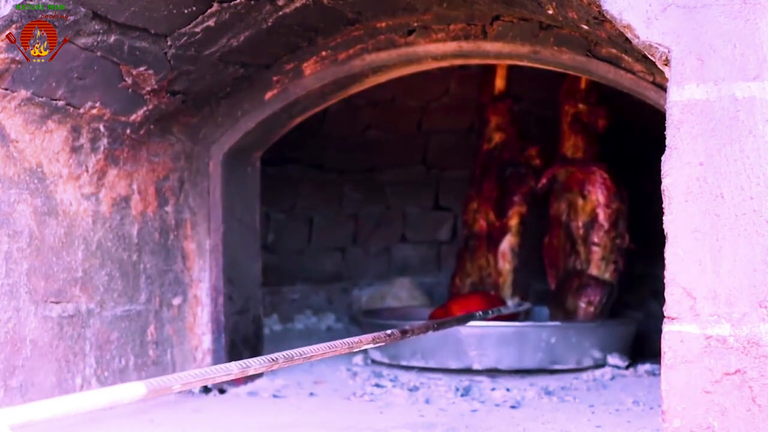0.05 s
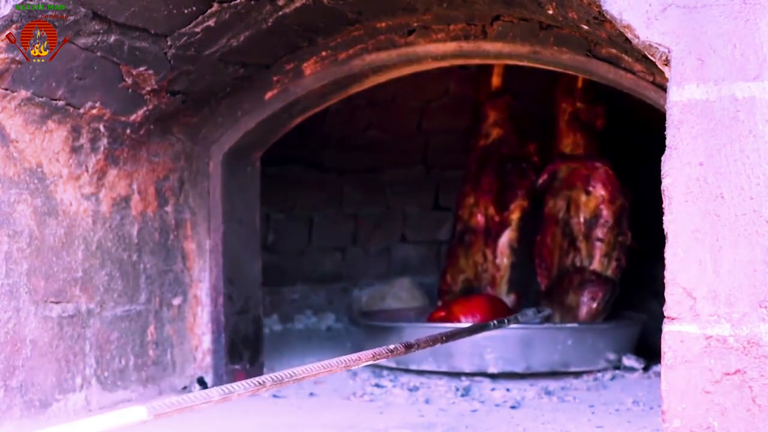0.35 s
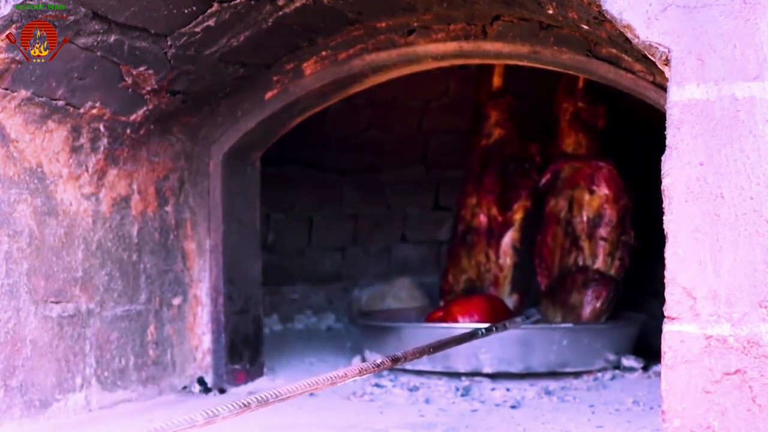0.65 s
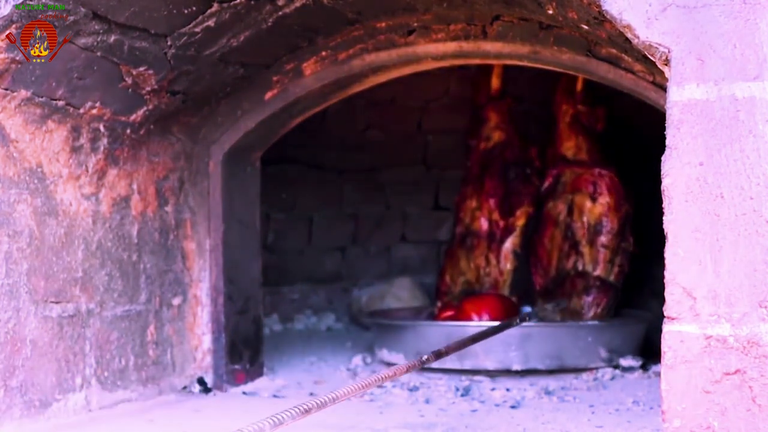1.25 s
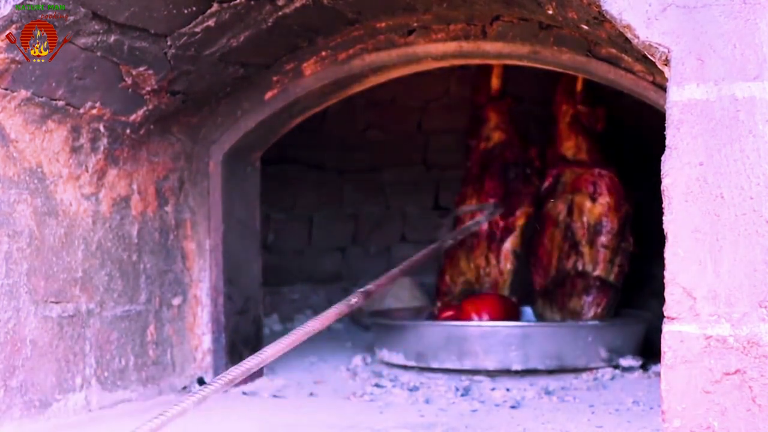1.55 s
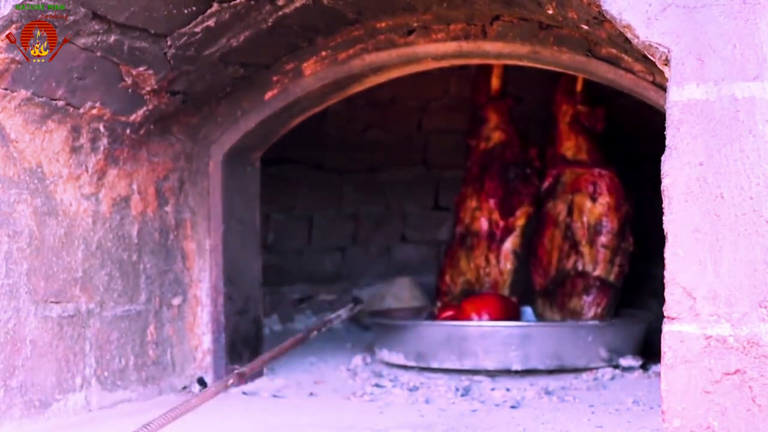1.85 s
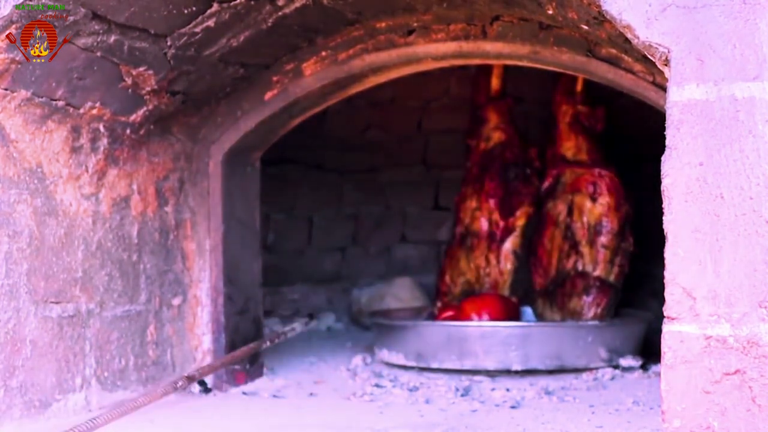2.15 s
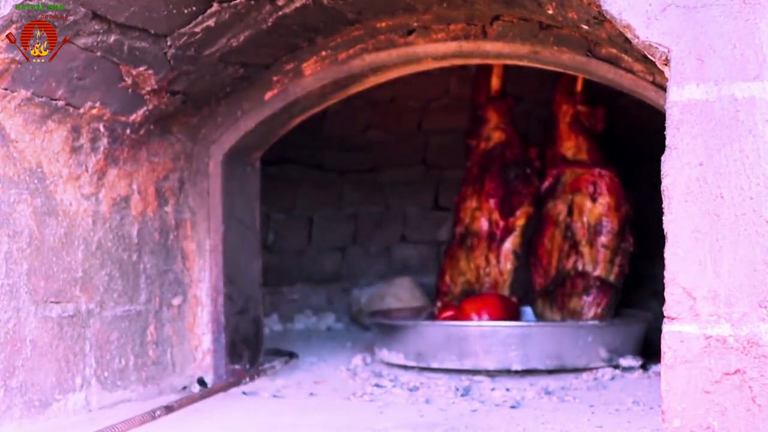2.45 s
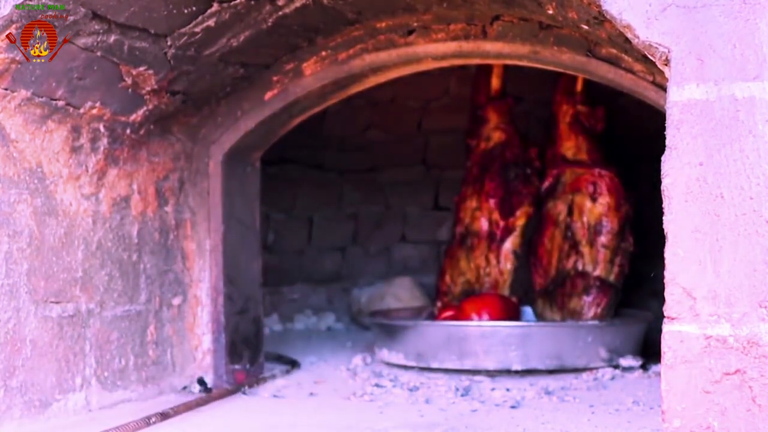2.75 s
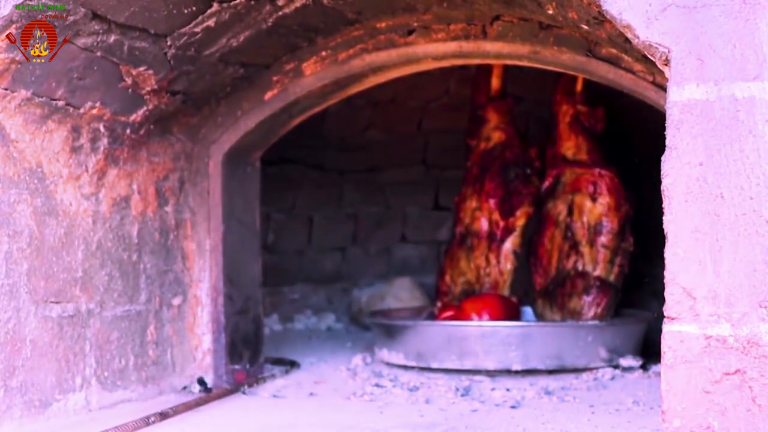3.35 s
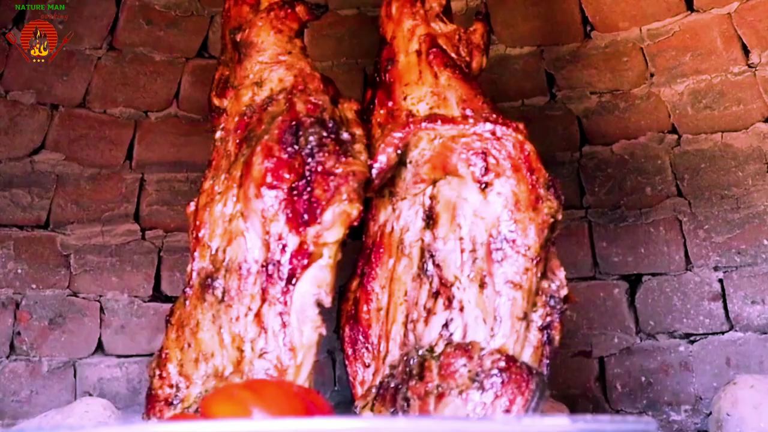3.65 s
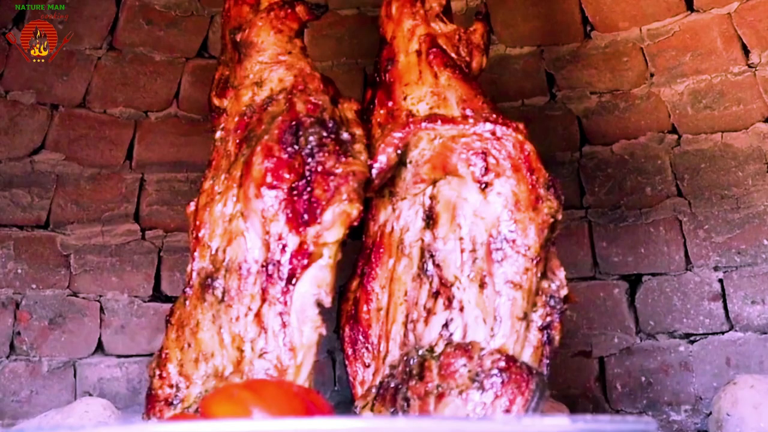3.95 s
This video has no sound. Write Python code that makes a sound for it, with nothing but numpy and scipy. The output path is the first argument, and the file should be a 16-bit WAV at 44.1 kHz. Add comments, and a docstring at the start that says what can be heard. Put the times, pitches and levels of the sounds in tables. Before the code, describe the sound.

Long metal tool scrapes a pan over a gritty oven floor, then knocks down, ringing.

```python
"""A gritty, ringing scrape: a long metal tool pushes a roasting pan over the floor of a brick oven.
Grit slips and cracks under the juddering pan, and the tool catches on it and bumps its rim.
Drawn out, the tool lands on the sill in a few bouncing knocks, head and shaft ringing; faint
clatter follows. Outdoors, wind rumbles on the microphone throughout, and in the second half
one small bird chirps while others twitter far away."""
import sys
import numpy as np
from scipy import signal
from scipy.fft import rfft, irfft, next_fast_len
from scipy.io import wavfile
from scipy.ndimage import map_coordinates

SR = 44100
rng = np.random.default_rng(int(sys.argv[2]) if len(sys.argv) > 2 else 0)


def transcribe(u):
    """Save the signal u as a 16-bit wav file named by the first command-line argument.

    u: samples, shape (n,) or (channels, n), limited to [-1, 1]; the rate is SR.
    q: integer samples, one column per channel.
    """
    v = np.clip(np.atleast_2d(u).T, -1, 1)
    q = np.round(v * 32767).astype(np.int16)
    wavfile.write(sys.argv[1], SR, q)


N = 176400

# faders of the three scrape layers: time_s, grind_db, rasp_db, hiss_db
SCRAPE_FADERS = [(0, -48, -55.5, -90), (.11, -46.5, -47, -63), (.3, -46, -49.5, -59),
                 (.35, -45.5, -48.5, -53.5), (.47, -43.5, -50, -55), (.53, -48, -54, -51.5),
                 (.65, -56.5, -53.5, -48), (.72, -49, -51, -53.5), (.78, -55, -53, -51.5),
                 (.89, -50, -56, -49), (.906, -58, -79, -63), (.93, -53.5, -58, -51.5),
                 (.99, -56.5, -54, -56.5), (1.09, -49, -49.5, -61), (1.165, -48.5, -55, -57.5),
                 (1.24, -59, -56, -58), (1.34, -49, -54.5, -65), (1.41, -65.5, -65.5, -78),
                 (1.48, -60.5, -62, -84), (1.56, -87, -96, -90), (1.9, -81, -73, -78),
                 (2.03, -57.5, -72, -76), (2.15, -79, -80, -72), (2.31, -87, -92, -92),
                 (2.36, -54, -75, -63.5), (2.43, -86, -89, -103)]
# tone of the low grind: freq_hz, gain_db
GRIND_EQ = [(200, -22), (430, -29), (720, -7), (1250, 7.5), (1900, 7.5), (2800, 1.5), (3800, -0.5),
            (7000, -39)]
# tone of the gritty rasp: freq_hz, gain_db
RASP_EQ = [(1200, 7), (2800, 5.5), (4000, 3), (4800, 6.5), (5900, 3.5), (7500, 2.5), (8700, 4), (9700, -16),
           (14000, -112)]
# tone of the fine hiss: freq_hz, gain_db
HISS_EQ = [(5000, 5), (8500, 13.5), (10200, 3), (13500, 7), (15800, -3)]
# resonances of the pan: pitch_hz, width_hz, gain_db
PAN_MODES = [(712, 12, -5.5), (855, 11.6, 0.5), (1160, 55, -9), (1255, 24, -1.5), (1523, 15, -2),
             (1714, 25, -2), (2042, 27, -7), (2300, 82, -11.5), (3050, 120, -16.5), (4640, 120, -16),
             (4960, 94, -15)]
# stereo image of the scrape, nearly mono: freq_hz, correlation
SCRAPE_IMAGE = [(100, .997), (1200, 0.98), (5000, 1), (9000, 1), (14000, 0.86)]

# gusts of wind: time_s, level_db
WIND_FADER = [(0.0, -44.5), (0.23, -46.5), (0.42, -42), (0.59, -46.5), (0.75, -37.5), (1.41, -37.5),
              (1.6, -42), (2.19, -41), (2.25, -45.5), (2.47, -39.5), (2.68, -41), (2.71, -46),
              (3.94, -46.5), (4.0, -40)]
# tone of the wind rumble: freq_hz, gain_db
WIND_EQ = [(12, 7), (28, -2), (55, -2), (90, -5), (150, -13), (280, -23), (600, -45), (2000, -81)]
# stereo image of the wind, nearly mono: freq_hz, correlation
WIND_IMAGE = [(25, .9995), (60, .999), (150, .997), (400, .99)]
# tone of the open air: freq_hz, gain_db
AIR_EQ = [(100, -1), (300, -3.5), (650, 3), (1200, -4.5), (2500, -8.5), (5000, -14), (8000, -19),
          (10500, -12.5), (14000, -18), (15800, -18.5)]
# stereo image of the air, wide above the bass: freq_hz, correlation
AIR_IMAGE = [(100, 1), (600, 0.67), (4000, 0.23), (10000, 0.58)]

# the pan's edge bites: start_s, level_db, length_s, centre_hz
PAN_BITES = [(.14, -51.5, 0.17, 4770), (0.542, -55, 0.1, 6200), (0.551, -48.5, 0.059, 8100),
             (.6, -53, 0.18, 13100)]
# the tool catches on the pan: start_s, level_db, ring_t60_s, centre_hz
PAN_BUMPS = [(0.193, -45, 0.056, 1720), (0.281, -41.5, 0.056, 1180), (0.294, -38, 0.047, 1180),
             (0.393, -38.5, 0.055, 666), (0.413, -47, 0.071, 680), (0.452, -39.5, 0.034, 1260),
             (1.185, -27.5, 0.01, 1243)]
# tone of a bump: multiple_of_centre, gain_db
BUMP_EQ = [(.17, -13), (.5, -25), (1, 12), (1.5, -3), (2.3, -3), (3, -32), (7.5, -38)]
# swells of the sliding pan's rumble: time_s, level_db
SLIDE_FADER = [(.55, -68), (.72, -55.5), (.89, -49), (.99, -66), (1.095, -52.5), (1.17, -62), (1.3, -78)]
# hollow tone of that rumble: freq_hz, gain_db
SLIDE_EQ = [(70, -21), (130, -1.5), (215, 1.5), (300, -10.5), (450, -16.5), (800, -45)]

# tone of metal on brick: freq_hz, gain_db
CLACK_EQ = [(100, -16), (300, -3.5), (600, 6.5), (1400, 2.5), (2500, -1), (4200, -4.5), (8000, -3),
            (9500, -1.5), (15000, -10)]
# light scuffs of the tool: start_s, level_db, cutoff_hz, rise_s
SCUFFS = [(1.295, -44, 9050, .008), (1.327, -36, 4430, 0.015), (1.455, -54, 4000, 0.013),
          (2.951, -36.5, 900, 0.015), (3.893, -45, 1600, 0.0078), (3.901, -39, 1900, 0.0041),
          (3.95, -30.5, 5630, 0.0095), (3.968, -33.5, 4230, 0.0035)]
# the head's rebound clonk, then dull taps: start_s, level_db, pitch_hz
HOLLOW_TAPS = [(2.679, -24.5, 1363), (3.856, -37.5, 660), (3.867, -41, 670), (3.894, -35.5, 546),
               (3.902, -34.5, 625)]

# calls of the nearer bird: start_s, level_db, start_pitch_hz
BIRD_CHIRPS = [(2.577, -47.5, 3550), (2.598, -58, 2960), (2.943, -53, 3500), (2.989, -49, 3300),
               (3.325, -55, 3200), (3.38, -52.5, 3010)]
# swells of the far birds: time_s, level_db
TWITTER_FADER = [(3.17, -80), (3.23, -65), (3.31, -62.5), (3.38, -80), (3.44, -75), (3.485, -57.5),
                 (3.55, -64), (3.62, -60), (3.7, -75), (3.8, -86)]
# tone of the far birds: freq_hz, gain_db
TWITTER_EQ = [(3500, -32), (4800, -14), (5800, -10), (7000, -13), (8500, -35)]

# the tool bounces on the sill: start_s, clack_db, cutoff_hz, head_db, ping_db, shaft_db, shimmer_db
SILL_KNOCKS = [(2.6369, -33, 7400, -26.5, -24.5, -58, -47), (2.6408, -29.5, 7500, -50, -50, -48, -70),
               (2.679, -32, 2000, -32.5, -36.5, -44.5, -79), (2.8505, -40, 3900, -46.5, -40.5, -49.5, -75),
               (2.877, -45, 3980, -56, -48, -67, -75), (2.882, -40, 1430, -53, -60, -65, -80),
               (2.976, -29.5, 1790, -38, -50, -32.5, -64), (2.983, -32.5, 2240, -54, -60, -52, -62),
               (3.0, -38, 1280, -64, -70, -66, -77), (3.0114, -27.5, 2500, -45, -36, -30, -64),
               (3.0185, -32.5, 2490, -50, -55, -42, -52)]
# modes of the tool's head: pitch_hz, level_db, t60_s
HEAD_MODES = [(345, -9, .05), (465, -9, .05), (835, -5, .06), (1048, -6, .068), (1409, -4, .055),
              (1620, -1, .057), (1829, -5, .06), (3084, -8, .05), (3252, -7, .045), (3740, -6, .055),
              (4022, -3, .04), (4207, -2, .05), (4598, -1, .065), (5556, 3, .042), (6880, -9, .06),
              (7510, -10, .05), (8250, -3, .07)]
# the head's single clear ping: pitch_hz, level_db, t60_s
PING_MODE = [(2712, 0, .065)]
# modes of the shaft: pitch_hz, level_db, t60_s
SHAFT_MODES = [(564, -2.5, .085), (646, -2.5, .085), (720, -6, .07), (790, -3, .075), (990, -2, .09),
               (1020, -5, .07), (1101, 0, .08), (1217, -4, .075), (1292, 0, .07), (1320, 0, .08),
               (1455, -2, .08), (1768, -4, .07), (1890, -5, .065), (2056, 0, .07), (2176, 0, .075),
               (2340, 1, .07), (2990, -10, .08)]
# the shaft's high shimmer: pitch_hz, level_db, t60_s
SHIMMER_MODES = [(3338, -3, .12), (3560, -5, .1), (3844, -1, .09), (4215, 0, .16), (4393, -2, .14),
                 (4678, -6, .18), (5222, 2, .12), (5658, -6, .12), (6250, -6, .1), (6700, -8, .09),
                 (7260, -4, .12), (7650, -9, .09)]
# the steel edge meets bare brick: start_s, relative_db
EDGE_HITS = [(2.6374, -8), (2.8484, -43), (2.9755, -31.5)]
# modes of that edge: pitch_hz, level_db, t60_s
EDGE_MODES = [(3570, -2.5, 0.0067), (4400, 4.5, 0.0022), (5200, -17, 0.0018), (7860, -9, 0.0073)]

CRACK_T60_S = 0.0027  # the snap at the front of a bump or clack
TOP_HZ = 15850


def amp(db):
    """Decibels to gain."""
    return 10 ** (np.asarray(db) / 20)


def unit(x):
    """Scale to rms 1."""
    return x / np.sqrt(np.mean(x ** 2) + 1e-20)


def along(points, hz):
    """Read a curve of (freq_hz, value) points on a log frequency axis."""
    freqs, values = np.transpose(points)
    return np.interp(np.log(hz + 1), np.log(freqs + 1), values)


def faders(rows):
    """One value per sample for each column after the time."""
    times, *columns = np.transpose(rows)
    return [np.interp(np.arange(N) / SR, times, column) for column in columns]


def wobble(per_s):
    """A smooth random curve with per_s knots a second."""
    return map_coordinates(rng.standard_normal(4096), [np.arange(N) * per_s / SR], mode="wrap")


def filtered(x, response):
    """Filter x by a function of frequency."""
    n = x.shape[-1]
    size = next_fast_len(n + 8192)
    return irfft(rfft(x, size) * response(np.fft.rfftfreq(size, 1 / SR)), size)[..., :n]


def coloured(x, eq):
    """x through an EQ curve, at rms 1."""
    return unit(filtered(x, lambda hz: amp(along(eq, hz))))


def causal(x, gain, size=2048):
    """Minimum-phase EQ of energy 1: no ringing ahead of the attack."""
    cepstrum = irfft(np.log(np.maximum(gain(np.fft.rfftfreq(size, 1 / SR)), 1e-6)))
    folded = 2 * cepstrum[:size // 2] * np.sign(np.arange(size // 2))
    impulse = irfft(np.exp(rfft(folded, size)))
    return signal.fftconvolve(x, impulse / np.linalg.norm(impulse))[:len(x)]


def patchy(x, depth_db, width_hz, life_s):
    """Shifting resonances: random gain patches over frequency and time, at rms 1."""
    spectra = signal.stft(x, nperseg=1024)[2]
    bins, frames = np.indices(spectra.shape[-2:])
    position = [bins * SR / 1024 / width_hz, frames * 512 / SR / life_s]
    patches = map_coordinates(rng.standard_normal((512, 512)), position, order=1, mode="wrap")
    return unit(signal.istft(spectra * amp(depth_db * unit(patches)), nperseg=1024)[1][..., :N])


def stereo(pair, image):
    """Blend two unrelated signals into left and right with the image's correlation."""
    angle = lambda hz: np.arccos(np.clip(along(image, hz), -1, 1)) / 2
    mid, side = filtered(pair, lambda hz: np.array([np.cos(angle(hz)), np.sin(angle(hz))]))
    return np.array([mid + side, mid - side])


def add(out, start_s, x):
    """Mix x into out at start_s."""
    part = out[max(round(start_s * SR), 0):][:len(x)]
    part += x[:len(part)]


def fade(t60):
    """A decay that loses 60 dB in t60 seconds."""
    return 1000. ** (-np.arange(SR // 3) / SR / t60)


def burst(t60):
    """Noise that dies away."""
    return fade(t60) * rng.standard_normal(SR // 3)


def ring(modes):
    """One blow on a set of modes, each at a random phase and slightly varied level."""
    t = np.arange(SR // 3) / SR
    return sum(amp(db + rng.normal(0, 1)) * fade(t60) * np.sin(2 * np.pi * (hz * t + rng.random()))
               for hz, db, t60 in modes)


def grit(slips_per_s=5000, cracks_per_s=170, crack_db=-6):
    """Fine grit slips and coarser grains crack under the pan: two unrelated streams of clicks."""
    slips = (rng.random((2, N)) < slips_per_s / SR) * np.sign(rng.standard_normal((2, N)))
    fine = slips * amp(3 * rng.standard_normal((2, N)))
    cracks = rng.random((2, N)) < cracks_per_s / SR
    coarse = cracks * amp(2.5 * np.tanh(rng.standard_normal((2, N))))
    return unit(fine) + amp(crack_db) * unit(coarse)


def pan_body(hz):
    """The loaded pan as a bank of resonators of alternating polarity."""
    return sum((-1) ** k * amp(db) * 1j * hz * width / (pitch ** 2 - hz ** 2 + 1j * hz * width)
               for k, (pitch, width, db) in enumerate(PAN_MODES))


def pan_scrape(body_db=-2):
    """Grit under the juddering pan: ringing grind, rasp and hiss, shifting with the contact point."""
    grind_db, rasp_db, hiss_db = faders(SCRAPE_FADERS)
    judder_db = 1.5 * wobble(per_s=88)
    grind = coloured(grit(), GRIND_EQ) + amp(body_db) * unit(filtered(grit(), pan_body))
    grind = patchy(grind, depth_db=4.5, width_hz=60, life_s=0.0925)
    rasp_db += 0.5 * judder_db + 0.52 * wobble(per_s=34)
    rasp = patchy(coloured(grit(), RASP_EQ), depth_db=2.8, width_hz=180, life_s=0.04)
    hiss_db += 1.8 * wobble(per_s=150)
    hiss = patchy(coloured(grit(), HISS_EQ), depth_db=3.5, width_hz=160, life_s=0.025)
    mix = amp(grind_db + judder_db) * grind + amp(rasp_db) * rasp + amp(hiss_db) * hiss
    return stereo(mix, SCRAPE_IMAGE)


def wind():
    """Gusts buffet the microphone with a low, unsteady rumble."""
    gust_db = faders(WIND_FADER)[0] + 2.1 * wobble(per_s=16)
    rumble = coloured(rng.standard_normal((2, N)), WIND_EQ)
    return amp(gust_db) * stereo(rumble, WIND_IMAGE)


def open_air(level_db=-56.5):
    """A wide, almost steady bed of outdoor hiss."""
    hiss = coloured(rng.standard_normal((2, N)), AIR_EQ)
    hiss = patchy(hiss, depth_db=0.8, width_hz=298, life_s=0.05)
    return amp(level_db + 0.3 * wobble(per_s=7.65)) * stereo(hiss, AIR_IMAGE)


def pan_bites(relative_width=0.09):
    """The pan's edge bites into grit: a narrow, bright band swells and fades."""
    out = np.zeros(N)
    for start_s, db, length_s, centre_hz in PAN_BITES:
        t = np.arange(int(length_s * SR)) / SR
        band = lambda hz: 1 / (1 + ((hz - centre_hz) / (relative_width * centre_hz)) ** 2)
        rasp = unit(filtered(rng.standard_normal(SR // 3), band))[:len(t)]
        add(out, start_s, amp(db) * np.sin(np.pi * t / length_s) * rasp)
    return out


def pan_bumps(ring_db=-3, thud_t60_s=0.054, crack_db=7):
    """The tool catches on the pan, then bumps it sharply: each knock sets the pan ringing."""
    out = np.zeros(N)
    for start_s, db, ring_t60_s, centre_hz in PAN_BUMPS:
        eq = np.array(BUMP_EQ) * [centre_hz, 1]
        impact = burst(thud_t60_s) + amp(crack_db) * burst(CRACK_T60_S)
        knock = causal(impact, lambda hz: amp(along(eq, hz)))
        body = causal(burst(ring_t60_s), lambda hz: abs(pan_body(hz)))
        add(out, start_s, amp(db) * (knock + amp(ring_db) * body))
    return out


def pan_slide():
    """The loaded pan rumbles hollowly as it is dragged over the bricks."""
    return amp(faders(SLIDE_FADER)[0]) * coloured(rng.standard_normal(N), SLIDE_EQ)


def clack(cutoff_hz, tail_t60_s=0.058, crack_db=3.5, filter_order=2.84):
    """Metal on brick: a crack and a dense short tail, duller for a softer contact."""
    tone = lambda hz: amp(along(CLACK_EQ, hz)) / np.sqrt(1 + (hz / cutoff_hz) ** (2 * filter_order))
    return causal(burst(tail_t60_s) + amp(crack_db) * burst(CRACK_T60_S), tone)


def tool_clatter(tap_rise_s=0.00065, tap_t60_s=0.032):
    """Light contacts of the tool: soft-edged scuffs and hollow one-note taps."""
    out = np.zeros(N)
    for start_s, db, cutoff_hz, rise_s in SCUFFS:
        add(out, start_s, amp(db) * (1 - fade(rise_s)) * clack(cutoff_hz))
    for start_s, db, pitch_hz in HOLLOW_TAPS:
        add(out, start_s, amp(db) * (1 - fade(tap_rise_s)) * ring([(pitch_hz, 0, tap_t60_s)]))
    return out


def near_bird(length_s=0.038, fall_hz_per_s=26000, waver_hz=70):
    """A small bird chirps in short, wavering whistles that dive in pitch."""
    out = np.zeros(N)
    t = np.arange(int(length_s * SR)) / SR
    swell = np.sin(np.pi * t / length_s)
    for start_s, db, start_pitch_hz in BIRD_CHIRPS:
        pitch_hz = start_pitch_hz - fall_hz_per_s * t + waver_hz * wobble(per_s=890)[:len(t)]
        add(out, start_s, amp(db) * swell * np.sin(2 * np.pi * np.cumsum(pitch_hz) / SR))
    return out


def far_birds():
    """Distant twitter, blurred into a flickering band of high noise."""
    level_db = faders(TWITTER_FADER)[0] + 2.5 * wobble(per_s=51)
    band = coloured(rng.standard_normal(N), TWITTER_EQ)
    return amp(level_db) * patchy(band, depth_db=5.5, width_hz=256, life_s=0.015)


def sill_knocks(shaft_rise_s=0.0034):
    """The head lands first, then the shaft drops and bounces; each clack rings both."""
    out = np.zeros(N)
    for start_s, clack_db, cutoff_hz, head_db, ping_db, shaft_db, shimmer_db in SILL_KNOCKS:
        lowpass = signal.butter(2, min(0.71 * cutoff_hz, TOP_HZ), fs=SR)
        head = amp(head_db) * signal.lfilter(*lowpass, ring(HEAD_MODES))
        shaft = amp(shaft_db) * ring(SHAFT_MODES) + amp(shimmer_db) * ring(SHIMMER_MODES)
        contact = amp(clack_db) * clack(cutoff_hz)
        ping = amp(ping_db) * ring(PING_MODE)
        add(out, start_s, contact + head + ping + (1 - fade(shaft_rise_s)) * shaft)
    return out


def edge_ticks(rise_s=0.0002):
    """The hard, bright first instant of steel meeting brick."""
    out = np.zeros(N)
    t = np.arange(SR // 3) / SR
    modes = sum(amp(db) * fade(t60) * np.sin(2 * np.pi * hz * t) for hz, db, t60 in EDGE_MODES)
    tick = (1 - fade(rise_s)) * modes / 2
    for start_s, db in EDGE_HITS:
        add(out, start_s, amp(db) * tick)
    return out


def shaft_zing(start_s=2.638, level_db=-26.5, length_s=0.0078, start_pitch_hz=4593, fall_s=0.004):
    """The first hard blow sends bending waves along the shaft, treble first: a quick falling zing."""
    out = np.zeros(N)
    t = np.arange(int(length_s * SR)) / SR
    pitch_hz = start_pitch_hz * np.exp(-t / fall_s)
    sweep = np.sin(2 * np.pi * np.cumsum(pitch_hz) / SR)
    add(out, start_s, amp(level_db) * signal.windows.tukey(len(t)) * sweep)
    return out


def scene():
    """Pan and tool sit in the centre; the birds spread wide, voiced separately on each side."""
    hits = pan_bumps() + sill_knocks() + shaft_zing() + edge_ticks() + tool_clatter()
    drag = pan_scrape() + pan_bites() + pan_slide()
    birds = np.array([near_bird() + far_birds() for _ in range(2)])
    return drag + hits + birds + wind() + open_air()


def record(dry):
    """A hard high cut at TOP_HZ over the whole mix."""
    return filtered(dry, lambda hz: hz < TOP_HZ)


dry = scene()
out = record(dry)
transcribe(out)
```